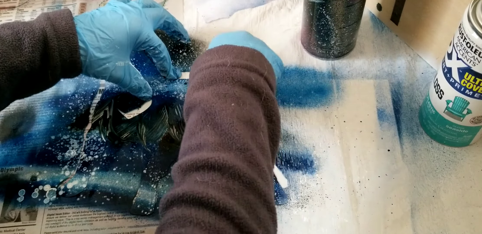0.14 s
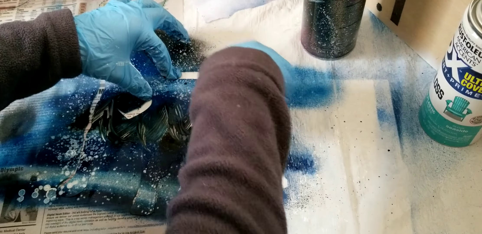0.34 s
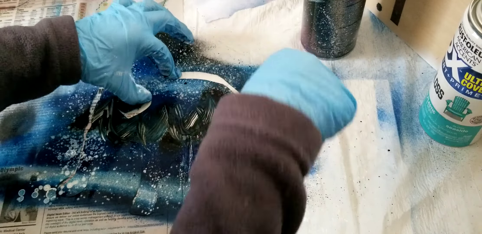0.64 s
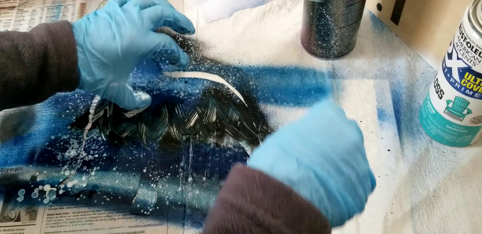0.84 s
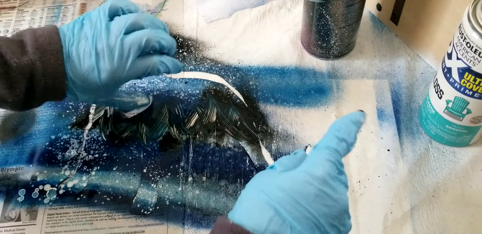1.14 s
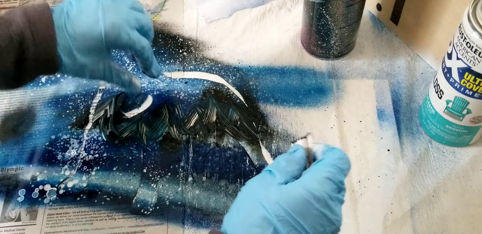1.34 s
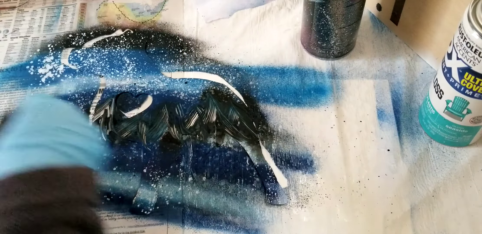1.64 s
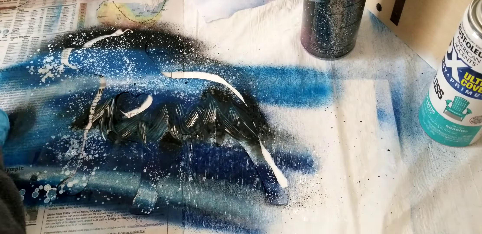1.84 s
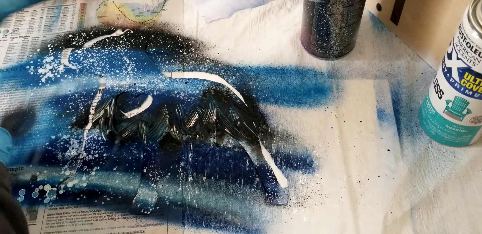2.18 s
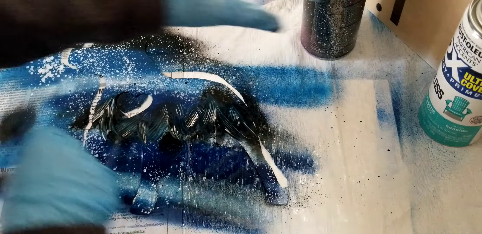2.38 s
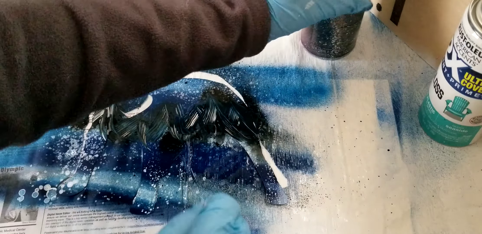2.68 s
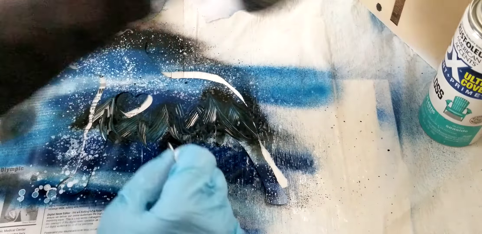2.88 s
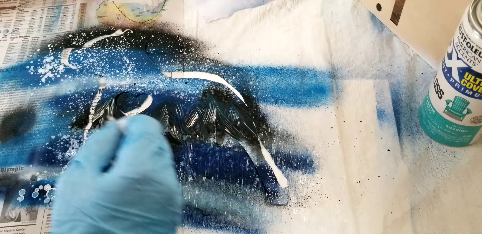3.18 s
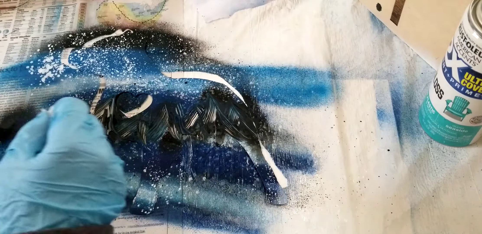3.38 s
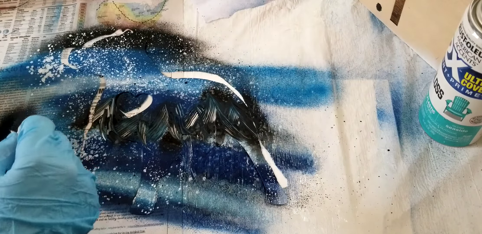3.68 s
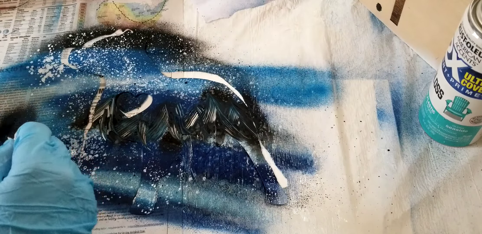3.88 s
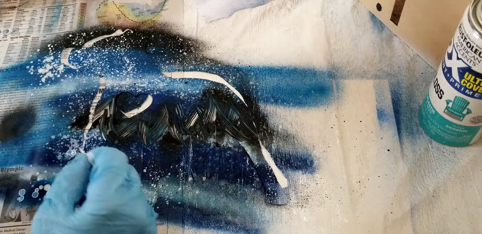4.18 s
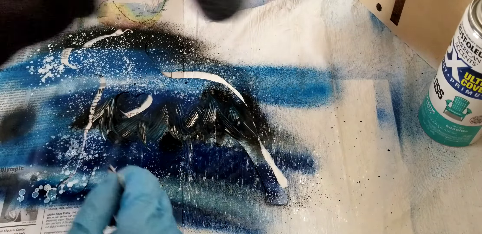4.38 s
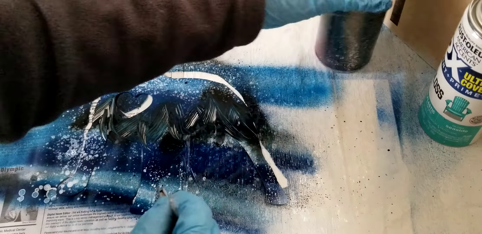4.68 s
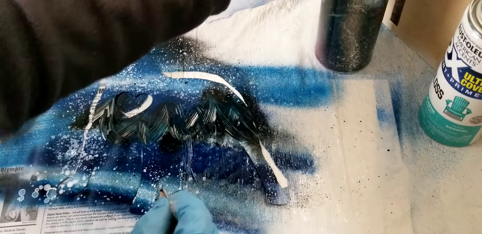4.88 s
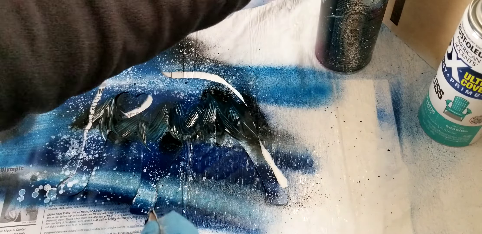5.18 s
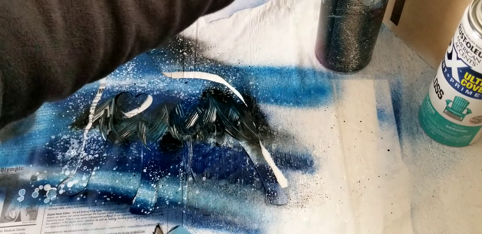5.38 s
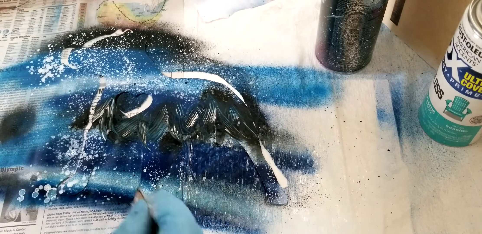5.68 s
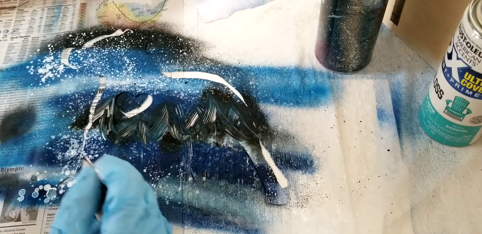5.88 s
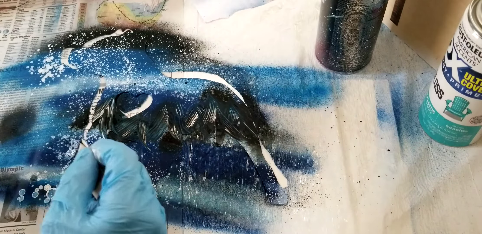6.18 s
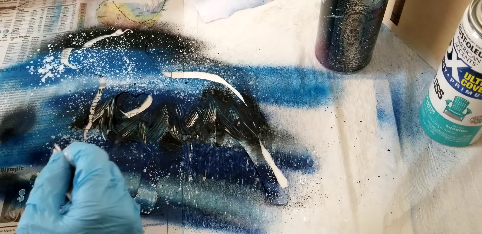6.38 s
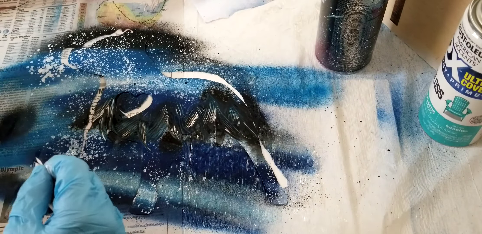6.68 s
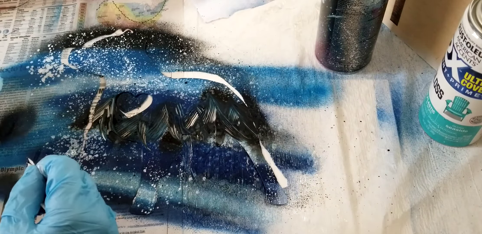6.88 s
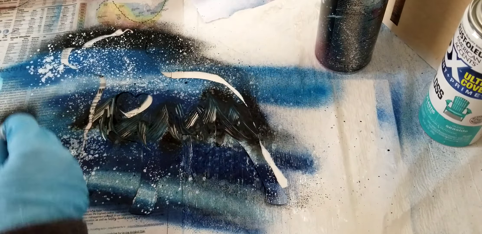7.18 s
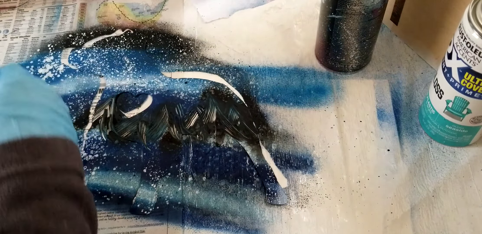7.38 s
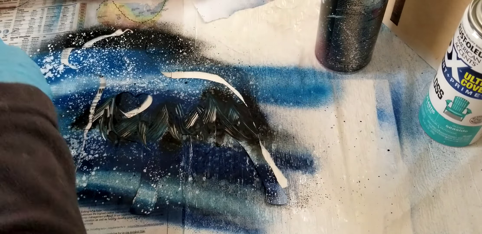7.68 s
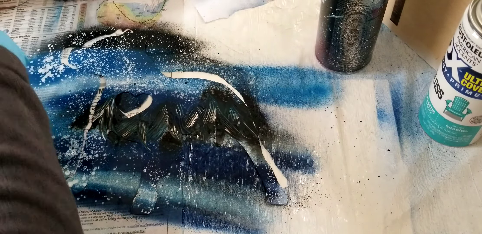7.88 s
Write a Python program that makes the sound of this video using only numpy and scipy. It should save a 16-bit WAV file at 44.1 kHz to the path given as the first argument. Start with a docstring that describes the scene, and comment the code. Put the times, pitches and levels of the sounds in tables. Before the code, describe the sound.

In a small, fairly dry room with a very faint low hum and hiss, rubber gloves rustle softly on paper, heard closely in stereo. Crisp snaps pop at about 0.8, 1.0 and 1.2 seconds, then near quiet with tiny taps around 2. A fleece sleeve swishes dully at 2.3 to 2.6, and a sharp crackle bursts at 2.7. From 3.1 to 3.5 paper tears raggedly with loud snaps and a brief squeak, followed by two quick bright hissing pulls at 3.5 and 3.7. Small clicks follow around 4. At 4.57 a paint can is set down with a hard knock, rocking in faint ringing taps until 5. A snap and short squeaky rub come at 5.4, a click at 5.9, then faint rubbing. Two more fast pulls zip on the left at 6.7 and 6.9, tearing and squeaking softly after 7.1. A hand thumps the table at 7.7, and light rustle ends it.

```python
"""Paper masking is peeled in strips off a spray-painted canvas by gloved hands, on a table in a small room.
Random grains, filtered, make it rustle, snap, tear and hiss in four quick pulls; ringing filters make it squeak.
A paint can is set down with a knock and rocks, and later a hand lands: blows ring the table and can modes.
A sleeve swishes and rubber fingertips rub, over a faint hum, rumble and hiss. Two microphones hear it all."""
import sys
import numpy as np
from scipy import signal
from scipy.fft import rfft, irfft
from scipy.io import wavfile

SR = 44100
rng = np.random.default_rng(int(sys.argv[2]) if len(sys.argv) > 2 else 0)


def store_wav(level_fs):
    """Save 16-bit WAV to argv[1]."""
    pcm = np.round(np.clip(np.atleast_2d(level_fs), -1, 1) * 32767)
    wavfile.write(sys.argv[1], SR, pcm.T.astype(np.int16))


N = 354563   # samples
TIME = np.arange(N) / SR   # s

# Source levels are relative: trims, panning and the room follow. Spectra are shapes, scaled to unit energy.


def from_db(db):
    """Decibels to gain."""
    return 10 ** (np.asarray(db) / 20)


def rms_one(x):
    """Scale to unit power."""
    return x / np.sqrt(np.mean(x ** 2) + 1e-20)


def at_hz(points, hz):
    """Read a table on a log-frequency axis."""
    f, value = np.transpose(points)
    return np.interp(np.log(np.maximum(hz, 1)), np.log(f), value)


def drift(rate):
    """Wandering value: random knots of spread 1, rate of them a second, joined by straight lines."""
    knots = rng.standard_normal(N // 8)
    return np.interp(TIME * rate, np.arange(len(knots)), knots)


def colour(x, *spectra, size=2048):
    """Causal (minimum-phase) filter of unit energy with the summed dB spectra."""
    hz = np.arange(size // 2 + 1) * SR / size
    level_db = sum(at_hz(s, hz) for s in spectra)
    cepstrum = irfft(np.log(from_db(level_db)))
    # folding the cepstrum onto positive time makes the filter minimum-phase
    cepstrum[1:size // 2] *= 2
    cepstrum[size // 2 + 1:] = 0
    response = irfft(np.exp(rfft(cepstrum)))
    return signal.fftconvolve(x, response / np.linalg.norm(response))[:len(x)]


def high_pass(x, order, hz):
    """Remove what lies below a frequency."""
    return signal.sosfilt(signal.butter(order, hz, "high", fs=SR, output="sos"), x)


def ring(x, hz, t60):
    """A resonance: a unit click sets a decaying sine of about height 1 ringing."""
    radius = np.exp(-np.log(1000) / (t60 * SR))
    w = 2 * np.pi * hz / SR
    feedback = [1, -2 * radius * np.cos(w), radius * radius]
    return signal.lfilter([0, np.sin(w)], feedback, x + 1e-18)


def grains(per_s, spread_db, size=N):
    """Clicks at random moments, a few much larger than the rest; unit power."""
    height_db = spread_db * np.minimum(rng.exponential(1, size), 4)
    heights = from_db(height_db) * rng.choice([-1, 1], size)
    return rms_one(heights * (rng.random(size) < per_s / SR))


def stroke(start_s, length_s, db, sag_db, attack_s, release_s):
    """Gain of one hand movement: it sets in, sags (or swells) while it lasts, and dies away."""
    t = np.maximum(TIME - start_s, 0)
    held = from_db(db - sag_db * np.minimum(t / length_s, 1))
    onset = 1 - np.exp(-t / attack_s)
    return held * onset * np.exp(-np.clip((t - length_s) / release_s, 0, 20))


def place(x, pan_db, lag_s_per_db=.00008):
    """Two microphones: the nearer one hears the sound louder and earlier (positive pan is left)."""
    lag = round(pan_db * lag_s_per_db * SR)
    left = np.pad(x, (max(-lag, 0), 0))[:len(x)]
    right = np.pad(x, (max(lag, 0), 0))[:len(x)]
    return np.array([left * from_db(pan_db / 2), right * from_db(-pan_db / 2)])


def diffuse(mid, side, apart_hz=900):
    """Sound from all round: alike at both microphones in the bass, unrelated in the treble."""
    side = high_pass(side, 2, apart_hz)
    return np.array([mid + side, mid - side])


def add(track, s, x):
    """Mix a short sound into a track at a time."""
    start = round(s * SR)
    track[..., start:start + x.shape[-1]] += x[..., :N - start]


# The room's low drone over time: time_s, level_db
DRONE = [(0.0, -61), (2.22, -59), (4.36, -69), (4.79, -58), (5.22, -67), (7.86, -64), (8.04, -68)]
# Lines of the hum: pitch_hz, level_db
HUM_LINES = [(59, -0.5), (118, -11.5), (177, -21), (236, -25), (295, -29), (356, -22), (432, -26)]
# Spectrum of the rumble and hiss: freq_hz, level_db
AIR_COLOUR = [(15, -33.5), (25, -9), (70, -1), (180, -19), (309, -23), (363, -19), (405, -24.5), (695, -32),
              (1650, -34), (2760, -32.5), (3160, -37), (6740, -28.5), (8590, -40.5), (12900, -26.5),
              (16000, -29.5)]
AIR_FOLLOWS = .25   # share of the drone's dB swing that the rumble and hiss follow


def room_tone():
    """A machine hum of sines, wavering in phase and level, over rumble and hiss of filtered noise."""
    hum = 0
    for hz, level_db in HUM_LINES:
        line = np.sin(2 * np.pi * hz * TIME + 0.63 * drift(7.7))
        hum = hum + from_db(level_db) * line * from_db(2.2 * drift(11))
    air = diffuse(*(colour(noise, AIR_COLOUR) for noise in rng.standard_normal((2, N))))
    drone_db = np.interp(TIME, *np.transpose(DRONE))
    air_db = -66.8 + AIR_FOLLOWS * (drone_db - drone_db.mean())
    tone = from_db(drone_db + 4) * hum + from_db(air_db) * air
    return tone * from_db([[1.2], [-1.2]])   # slightly louder on the left


# The gloves shift on the paper: middle_s, half_length_s, brush_db, whisper_db
SHIFTS = [(0.34, .09, -73, -63), (0.6, .1, -72, -62), (0.78, .12, -63, -52), (1.0, .05, -63, -54),
          (1.34, .08, -67, -61), (1.54, .1, -65, -64), (1.82, .2, -75, -71), (2.17, .22, -70, -64),
          (2.62, .1, -67, -60), (2.89, .06, -61, -55), (3.04, .045, -59, -51), (3.35, .25, -62, -58),
          (4.16, .045, -63, -61), (4.76, .08, -71, -64), (5.0, .14, -74, -71), (5.17, .035, -68, -68),
          (5.9, .13, -67, -70), (6.19, .16, -69, -66), (6.6, .08, -74, -78), (7.17, .11, -62, -56),
          (7.47, .07, -74, -70), (7.88, .12, -72, -64)]
# Spectrum of the brushing: freq_hz, level_db
RUSTLE_COLOUR = [(600, -14), (1500, -7), (3000, -4), (6800, 1), (8000, -8), (9500, -25), (16000, -40)]
# Spectrum of the high whisper: freq_hz, level_db
WHISPER_COLOUR = [(4000, -40), (8000, -9), (10500, -3.5), (13000, 2), (16000, 0.5)]
RESTING_BRUSH_DB, RESTING_WHISPER_DB = -86, -80   # the hands are never quite still


def rustle():
    """Rubber and cloth brush the paper in uneven grains; the finest of them give a thin high whisper."""
    brushing, whispering = from_db(RESTING_BRUSH_DB), from_db(RESTING_WHISPER_DB)
    for middle_s, half_s, brush_db, whisper_db in SHIFTS:
        # each shift speeds up and slows down evenly
        speed = np.exp(-np.minimum(((TIME - middle_s) / half_s) ** 2, 20))
        brushing = brushing + from_db(brush_db) * speed
        whispering = whispering + from_db(whisper_db) * speed
    touch = from_db(2.0 * drift(45))
    brush = colour(grains(per_s=5000, spread_db=3.0) * touch * brushing, RUSTLE_COLOUR)
    whisper = colour(grains(per_s=8000, spread_db=3.0) * touch * whispering, WHISPER_COLOUR)
    return place(from_db(-1.8) * brush + from_db(-1.2) * whisper, pan_db=2.0)


# Sharp snaps and contact clicks: start_s, level_db, body_db, edge_db, left_over_right_db, decay_s
SNAPS = [(0.587, -35.5, -21, 3, 3.5, .003), (0.804, -21, -9.5, 5.5, 2.5, .005),
         (0.971, -28.5, -13.5, 4.5, -1.5, .004), (0.997, -24, -14.5, 4, -0.5, .003),
         (1.04, -10.5, -11, 2, -0.5, .002), (1.208, -13, -11.5, -1, 4, .0016),
         (1.358, -33, -18.5, 1, 1.5, .0026), (1.897, -45, -12, 0, 6.5, .006),
         (1.917, -40, -16.5, -4.5, 5, .006), (2.016, -40.5, -9, -3.5, 3.5, .006),
         (2.099, -39, -14.5, -4.5, 3, .007), (2.517, -35.5, 1.5, 13, -0.5, .004),
         (2.64, -26.5, -8.5, 8.5, -0.5, .0015), (2.69, -29.5, -6.5, 2.5, -0.5, .004),
         (2.723, -18, -5.5, 5.5, -0.5, .0046), (2.731, -9.5, -8, 5.5, 0.5, .0033),
         (2.7445, -19.5, -0.5, 1, -1.5, .0014), (2.912, -32.5, -7, 6, 4.5, .007),
         (3.117, -12, -4.5, 1.5, 7, .005), (3.147, -15, 0, -2.5, 5, .005), (3.185, -17, -2, 2.5, 7, .005),
         (3.2675, -6.5, -9.5, -1, 7, .0035), (3.292, -10.5, -9.5, -2, 5, .007),
         (3.3455, -14, -9.5, -1, 5, .006), (3.388, -23, -8, -1, 5, .005),
         (3.886, -26.5, -7.5, -5, 4.5, .0046), (3.96, -17, -8.5, -4, 6, .0024),
         (3.994, -34.5, -6, -4, 4, .005), (4.012, -27, -13, -6, 7, .003), (4.12, -26, -22.5, -3, 6, .0013),
         (4.172, -36.5, -9.5, 1.5, 4.5, .0046), (4.227, -39, -21, -2.5, 3.5, .003),
         (4.573, -6.5, -1, -3, 2, .002), (4.589, -10.5, -2, 0.5, 2, .0026),
         (4.6, -17, -4.5, -3.5, -1, .003), (4.672, -28, -5, -7.5, 2, .003),
         (4.791, -34, -4, 5.5, 1.5, .003), (4.872, -33, -8.5, -8.5, 4.5, .002),
         (5.034, -38, -19, -1, 0.5, .006), (5.293, -25, -21, 4.5, -0.5, .0035),
         (5.365, -25, -4.5, 0.5, 2, .003), (5.39, -15.5, 0.5, 3.5, 0, .003),
         (5.402, -14.5, 0, -1, -1, .004), (5.418, -21, -2.5, -4.5, 0, .006),
         (5.9435, -15, -7, 9, 9.5, .0005), (6.017, -41, -7.5, -9, 7.5, .004), (7.096, -15, -6, -2, 5, .004),
         (7.158, -21, -8, 2, 5.5, .004), (7.223, -27, -8, -2.5, 6, .005), (7.426, -39, -7.5, -2.5, 5, .003),
         (7.726, -23.5, 6, -7, 5, .004), (7.763, -19.5, -2, 1, 3.5, .003), (7.937, -41, 1, -6.5, 3, .003),
         (7.956, -31, -13, -0.5, 3.5, .004)]
# Spectrum shared by the snaps: freq_hz, level_db
SNAP_COLOUR = [(200, -26), (700, -20), (1500, -5), (2800, -2), (4500, 0), (7000, 2), (8600, -9),
               (10500, -5), (13000, -1), (16000, -1)]


def snaps(rise_share=.2, crack_s=.0013, size=4096):
    """Each snap is an avalanche of fractures around one clean crack, and dies within milliseconds."""
    out, t = np.zeros((2, N)), np.arange(size) / SR
    usual_body, usual_edge = np.mean(SNAPS, axis=0)[2:4]
    for start_s, db, body_db, edge_db, pan_db, decay_s in SNAPS:
        burst = grains(per_s=12000, spread_db=2.5, size=size) * np.exp(-t / decay_s)
        rise_s = rise_share * decay_s   # a longer avalanche is slower to build
        burst *= 1 - np.exp(-t / rise_s)
        burst /= np.linalg.norm(burst)
        burst[round(rise_s * SR)] += crack_s / decay_s   # the shortest snaps are nearly all crack
        burst *= np.sqrt(decay_s * SR / 2) / np.linalg.norm(burst)
        tint = [(1800, body_db - usual_body), (5000, 0), (12000, edge_db - usual_edge)]
        add(out, start_s, place(from_db(db - 7.5) * colour(burst, SNAP_COLOUR, tint), pan_db))
    return out


# Slow ragged tearing builds until the paper gives, then fades: give_s, level_db, build_s, fade_s
TEARS = [(0.808, -49, .09, .12), (1.04, -50, .04, .025), (2.733, -47, .05, .035), (2.9, -61, .13, .11),
         (3.115, -53, .15, .03), (3.122, -45, .008, .13), (3.29, -35, .075, .22), (3.455, -48, .05, .04),
         (4.016, -56, .08, .06), (5.418, -44, .09, .03), (6.18, -54, .14, .07), (6.27, -60, .09, .16),
         (7.095, -52, .15, .12), (7.165, -48, .02, .28), (7.24, -49, .12, .11)]
# Spectrum of the tearing: freq_hz, level_db
TEAR_COLOUR = [(180, -61), (300, -31), (455, -19), (614, -25), (1530, -9), (2140, -7), (2700, 0),
               (3520, -8), (4160, 0), (6850, -2.5), (8360, -16), (10700, -6), (16000, -7)]
TEAR_SWING_DB = 25   # rise over build_s, and fall over fade_s


def tears():
    """Slow tearing lets go of fewer, larger fibres than a fast pull, in clumps."""
    fibres = grains(per_s=1400, spread_db=3.5) * from_db(3.0 * drift(160))
    force = 0
    for give_s, db, build_s, fade_s in TEARS:
        away = np.maximum((give_s - TIME) / build_s, (TIME - give_s) / fade_s)
        force = force + from_db(db - TEAR_SWING_DB * np.clip(away, 0, 10))
    return place(from_db(0.8) * colour(fibres * force, TEAR_COLOUR), pan_db=4.5)


# The can and the hands strike the table: start_s, level_db, boom_db, clack_db, can_ring_db
BLOWS = [(2.018, -42, 4, -22, -18), (2.036, -48, 8, -20, -20), (2.106, -44, -8, -16, -3),
         (2.135, -48, -5, -18, -10), (2.368, -53, -4, 3, -20), (2.674, -49, -4, -4, -20),
         (2.735, -33, -4, 2, -9.5), (2.8, -43, -8, -6, -24), (4.573, -12.5, -4, 2, -10),
         (4.59, -23, -4, 3, -16), (4.661, -34, -6, -8, -12), (4.775, -37, -8, -1, -3.5),
         (4.801, -36, -9, -1, 1), (4.838, -39, -3, -10, -8), (4.889, -39, 0, -12, -10),
         (4.921, -45, -4, -3, 2), (4.968, -38, -12, -8, 4), (5.042, -42, -15.5, -7, 6),
         (5.392, -42, -14, 6, -20), (7.726, -13.5, -3, 4, -18), (7.743, -26, 6.5, -4, -25.5),
         (7.82, -39, -2, 0, -10)]
# Spectrum of the thud: freq_hz, level_db
THUD_COLOUR = [(30, -22), (60, -13), (100, -3), (180, -1), (280, 0), (430, -3), (680, -11), (1100, -10),
               (2500, -19), (6000, -32)]
# The table top rings: pitch_hz, level_db, t60_s
TABLE_MODES = [(96, -8, .11), (118, -2.5, .14), (134, -10, .09), (165, -15, .11), (196, -10.5, .16),
               (254, -9, .18), (312, -14, .1), (403, -14, .16), (440, -22, .11), (475, -18, .15),
               (579, -28, .1), (775, -22, .08)]
# The paint can rings on the table: pitch_hz, level_db, t60_s
CAN_MODES = [(234, -22, .9), (610, -38, .5), (853, -35, .7), (1187, -19, .12), (1500, -24, .08),
             (2720, -26, .2)]


def blows(contact_s=0.0013, thud_s=0.015, boom_below_hz=150, size=16384):
    """A blow gives a dense thud of things lying on the table, and rings the top and the can."""
    thuds, pushes, booms, rims = np.zeros((4, N))
    t = np.arange(size) / SR
    push = np.exp(-t / contact_s * 2 * np.pi)   # all but gone after contact_s
    push /= push.sum()
    for start_s, db, boom_db, clack_db, can_db in BLOWS:
        rattle = rng.standard_normal(size) * np.exp(-t / thud_s)
        thud = colour(rattle, THUD_COLOUR, [(400, 0.017), (1200, clack_db)])
        add(thuds, start_s, from_db(db - 10.5) * thud)
        add(pushes, start_s, from_db(db) * push)
        add(booms, start_s, from_db(db + boom_db) * push)   # a heavy, soft blow feeds the lowest modes most
        add(rims, start_s, from_db(db + can_db) * push)
    top = 0
    for hz, db, t60 in TABLE_MODES:
        struck = booms if hz < boom_below_hz else pushes
        top = top + from_db(db) * ring(struck, hz, t60)
    can = sum(from_db(db) * ring(rims, hz, t60) for hz, db, t60 in CAN_MODES)
    heard = place(thuds, pan_db=2.0) + place(can - top, pan_db=4.0, lag_s_per_db=.00004)
    return high_pass(heard, 3, 64)   # little of the blows lies below 64 Hz


# An arm reaches across the table: start_s, length_s, level_db, sag_db
REACHES = [(2.255, .035, -64, 3), (2.36, .27, -62, 7)]
# Spectrum of the swish: freq_hz, level_db
SLEEVE_COLOUR = [(400, -16.5), (1200, -9.5), (1900, 0), (2700, -4.5), (4500, -15.5), (12000, -29)]


def sleeve():
    """A fleece sleeve sweeps over the table: dense friction grains give a dull swish."""
    sweep = sum(stroke(*reach, attack_s=.012, release_s=.03) for reach in REACHES)
    return place(colour(grains(per_s=7200, spread_db=2.2) * sweep, SLEEVE_COLOUR), pan_db=2.0)


# The paper sticks and slips; a tauter strip rings higher (negative sag swells):
# start_s, length_s, level_db, sag_db, slips_per_s, unevenness, pitch_ratio
SQUEAKS = [(3.116, .068, -32, 6.5, 222, .02, 1.0), (3.255, .21, -43, 5, 260, .48, 1.0),
           (5.361, .046, -49, -5, 400, .35, 1.21), (7.1, .14, -60, 2, 300, .5, 1.04)]
# Resonances of the taut strip: pitch_hz, width_hz, level_db
STRIP_MODES = [(1370, 240, -1), (2120, 350, -1), (2760, 300, -0.5)]


def squeak(start_s, length_s, db, sag_db, slips_per_s, unevenness, pitch_ratio):
    """Slips of the paper ring the stretched strip: regular slips squeak, uneven ones sound ragged."""
    turns = np.cumsum(slips_per_s * np.exp(unevenness * drift(250))) / SR
    slips = np.diff(np.floor(turns), prepend=0) * from_db(2.0 * drift(200))   # one click a turn
    tone = 0
    for hz, width_hz, level_db in STRIP_MODES:
        t60 = np.log(1000) / (np.pi * width_hz)
        tone = tone + from_db(level_db) * ring(slips, hz * pitch_ratio, t60)
    tone = rms_one(high_pass(tone, 4, 1050))
    gain = stroke(start_s, length_s, db, sag_db, attack_s=.002, release_s=.008)
    return place(from_db(-1.5) * tone * gain, pan_db=3.5)


# Strips pulled off at speed (negative sag swells): start_s, length_s, level_db, sag_db, left_over_right_db
PULLS = [(3.513, .155, -28.5, 3.5, 2.5), (3.733, .127, -31, -.5, 4.0), (6.679, .149, -27.5, 6.5, 5.5),
         (6.903, .129, -29, 7, 7.0)]
# Spectrum of the pulls: freq_hz, level_db
PULL_COLOUR = [(180, -56), (300, -30), (405, -24), (565, -31), (856, -30), (946, -32), (1510, -26),
               (1810, -34), (2100, -21.5), (2650, -14.5), (3190, -18), (6960, -8), (8640, -16),
               (12700, 0.5), (16000, -3)]


def pulls():
    """A fast pull breaks thousands of tiny glue bonds a second: a bright, slightly fluttering hiss."""
    bonds = grains(per_s=9000, spread_db=2.0) * from_db(1.9 * drift(300))
    out = 0
    for *pull, pan_db in PULLS:
        gain = stroke(*pull, attack_s=.014, release_s=.009)
        out = out + place(colour(bonds * gain, PULL_COLOUR), pan_db)
    return from_db(3.0) * out


def gliding_ring(x, hz, width_hz):
    """A resonance whose centre moves; unit power."""
    turn = np.exp(2j * np.pi * np.cumsum(hz) / SR)
    # shift the centre down to 0 Hz, filter there, and shift back
    inside = signal.sosfilt(signal.butter(2, width_hz / 2, fs=SR, output="sos"), x / turn)
    return rms_one((inside * turn).real)


# Gliding notes: the first is a loud rasp of the taut strip as it squeaks; the rest are rubber fingertips #
# sliding on the paper with a faint gliding note: # start_s, length_s, level_db, first_pitch_hz, last_pitch_hz,
# overtone_db
RUBS = [(5.35, .05, -39.5, 1580, 1700, -14), (5.76, .24, -70, 1060, 1350, 3),
        (6.15, .29, -65, 1560, 1720, -10), (6.55, .1, -64.5, 2050, 2150, -10),
        (7.04, .1, -54, 1750, 1480, -8), (7.18, .06, -56, 2320, 2220, -8),
        (7.22, .12, -64.5, 1100, 1290, -8)]
RUB_WIDTH_HZ, RUB_OVERTONE_RATIO = 200, 1.7   # the overtone is wider by the same ratio


def rubs(size=20000):
    """Friction grains ring a patch of paper whose pitch glides, as a finger travels or the strip rasps."""
    out, t = np.zeros(N), np.arange(size) / SR
    for start_s, length_s, db, first_hz, last_hz, overtone_db in RUBS:
        friction = grains(per_s=1200, spread_db=2.5, size=size) * from_db(3.0 * drift(50)[:size])
        hz = np.interp(t, [0, length_s], [first_hz, last_hz])
        note = gliding_ring(friction, hz, RUB_WIDTH_HZ)
        overtone = gliding_ring(friction, hz * RUB_OVERTONE_RATIO, RUB_WIDTH_HZ * RUB_OVERTONE_RATIO)
        note += from_db(overtone_db) * overtone
        gain = stroke(0, length_s, db, sag_db=0, attack_s=.04, release_s=.013)[:size]
        add(out, start_s, note * gain)
    return place(from_db(-2.0) * out, pan_db=3.0)


# Reverberation of the small room: freq_hz, t60_s
ROOM_T60 = [(100, .26), (500, 0.32), (1200, .25), (2600, .23), (7000, 0.18), (15000, 0.15)]


def room(x, wet_db, build_s=0.0037, size=24000):
    """Close walls return a dense tail that dies fastest in the treble."""
    t, edges_hz = np.arange(size) / SR, np.geomspace(40, 20000, 10)
    echoes = grains(per_s=5000, spread_db=2.0, size=4 * size).reshape(2, 2, size)
    tail = 0
    for k, (low, high) in enumerate(zip(edges_hz, edges_hz[1:])):
        # neighbouring bands use different echoes
        band = signal.sosfilt(signal.butter(2, [low, high], "band", fs=SR, output="sos"), echoes[k % 2])
        tail = tail + band * np.exp(-np.log(1000) * t / at_hz(ROOM_T60, np.sqrt(low * high)))
    tail = diffuse(*tail, apart_hz=450) * (1 - np.exp(-(t / build_s) ** 2))
    tail /= np.linalg.norm(tail, axis=1, keepdims=True)
    return x + from_db(wet_db) * signal.fftconvolve(x, tail, axes=1)[:, :N]


def scene():
    """Paper, table and room together; the blows get the least reverberation."""
    squeaks = sum(squeak(*row) for row in SQUEAKS)
    handling = rustle() + snaps() + tears() + sleeve() + squeaks + rubs()
    paper = room(handling, wet_db=-4.5) + room(pulls(), wet_db=-3.5)
    return room_tone() + paper + room(blows(), wet_db=-10.0)


CUTOFF_HZ = 15900


def record(dry):
    """The microphone signals lose their top above the cutoff, steeply."""
    return signal.sosfilt(signal.ellip(10, .2, 70, CUTOFF_HZ, fs=SR, output="sos"), dry)


dry = scene()
out = record(dry)
store_wav(out)
```